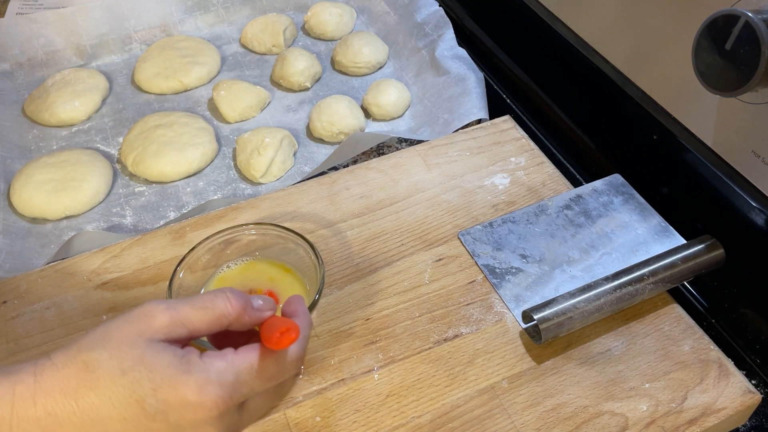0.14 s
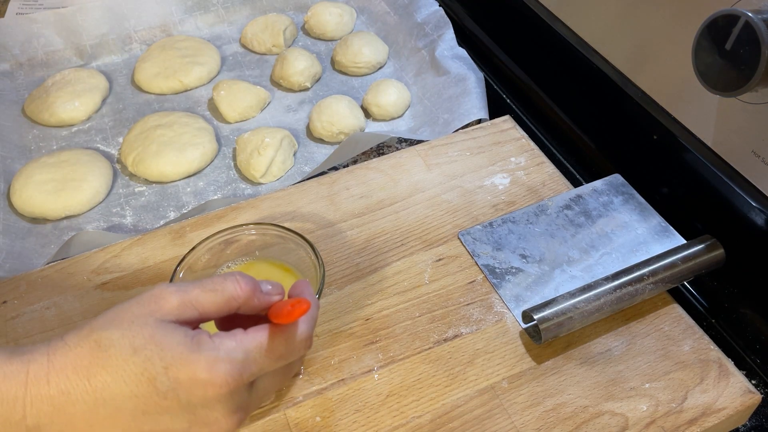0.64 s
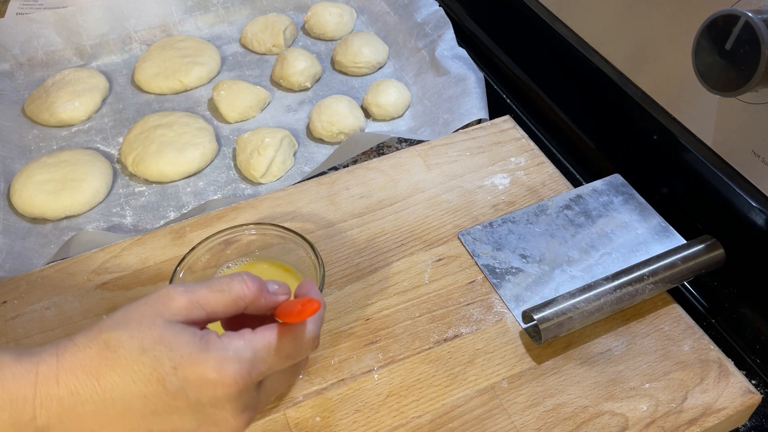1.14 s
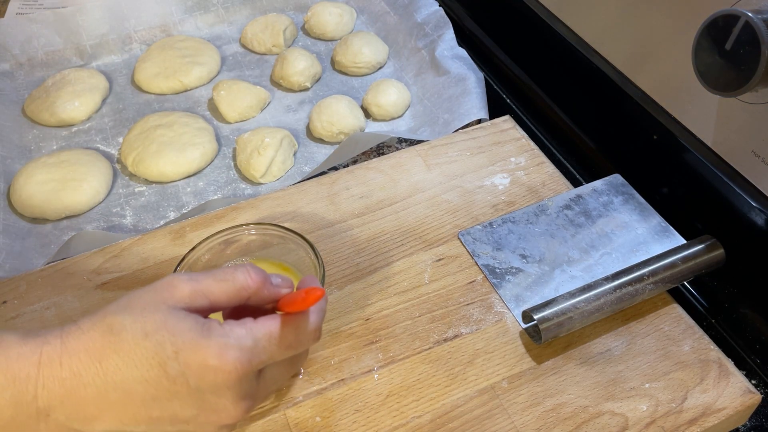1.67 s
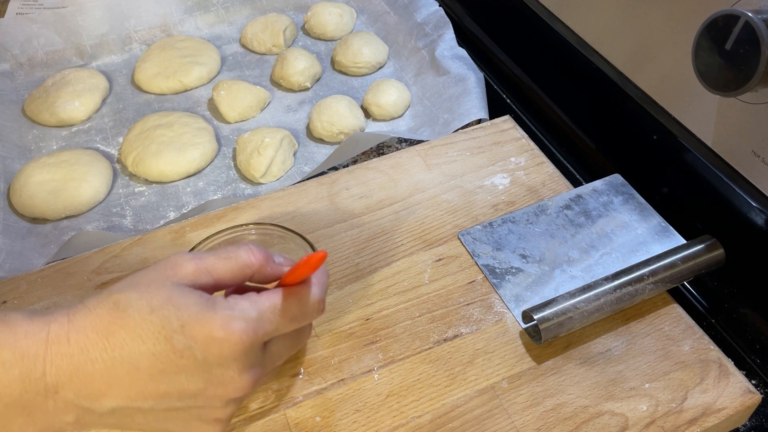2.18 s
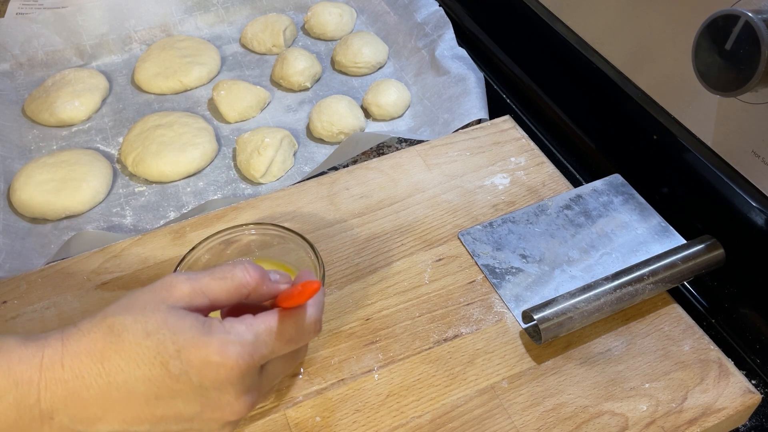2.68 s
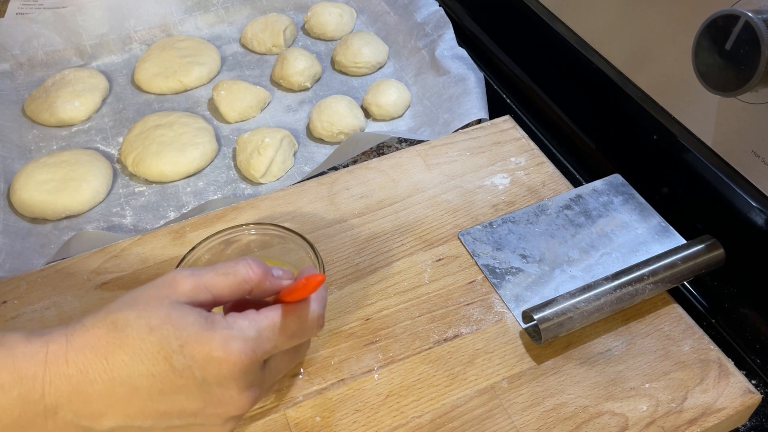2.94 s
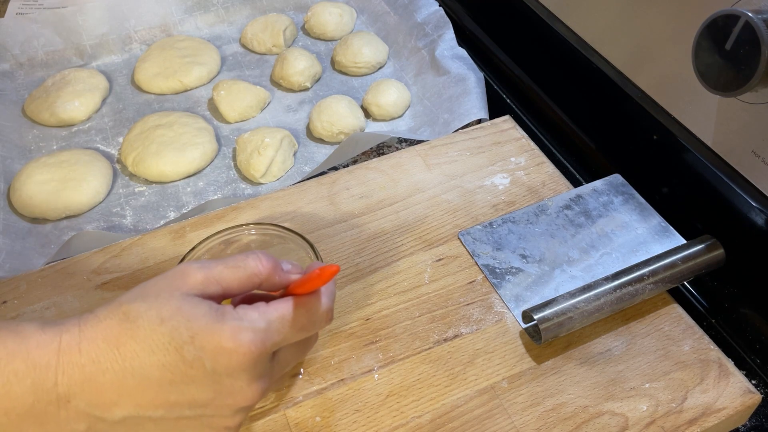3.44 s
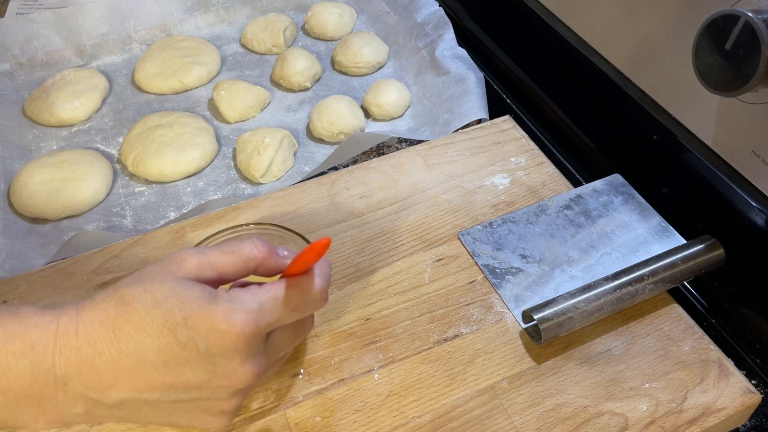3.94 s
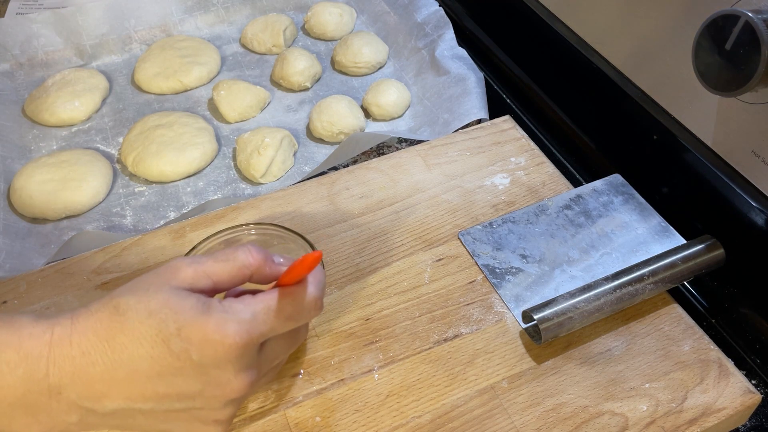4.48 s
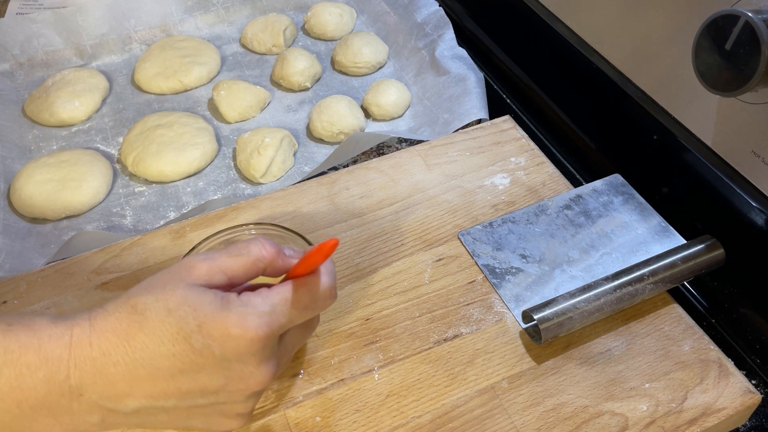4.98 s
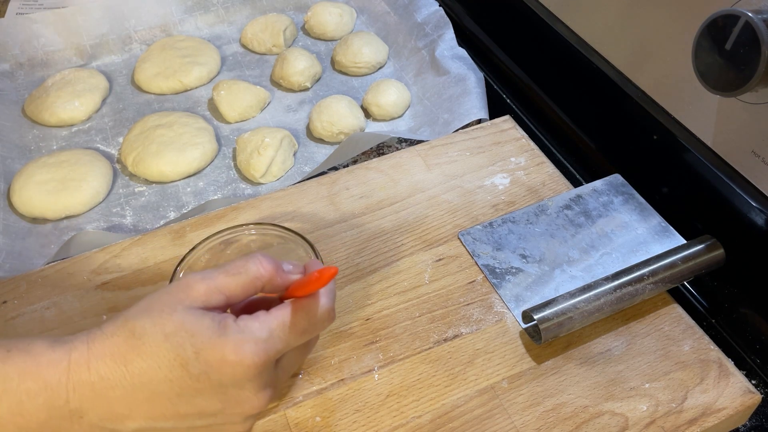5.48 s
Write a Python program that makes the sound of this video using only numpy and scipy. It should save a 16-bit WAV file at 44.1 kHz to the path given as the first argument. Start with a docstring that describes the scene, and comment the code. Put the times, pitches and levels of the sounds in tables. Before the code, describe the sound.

In a quiet kitchen, a silicone brush beats egg in a small glass bowl on a wooden board. For the first half second there is only soft room air and a faint, wavering low appliance hum. Light wet ticks and a short scrape start at 0.5, thickening into slaps by 0.8 and a strong splashy clatter around 0.95-1.05, with thin glass ringing. After a brief lull, drags and taps return at 1.4-2.0. A dense, hollow knocking cluster comes at 2.25-2.5, then a gap, and a sharp bright slap at 3.07. Looser slaps, bubble plips and a fading slosh fill 3.2-4.0; regular small clacks continue to a strong slap at 4.9. It then thins: a weak tap at 5.16, a barely audible squeak at 5.4 and a faint last touch at 5.55. Close, dry mono sound with short hard-wall reflections and softened extreme treble.

```python
"""In a quiet kitchen, a silicone brush beats egg in a small glass bowl that stands on a wooden board.
Wet bristles drag along the glass as lumpy noise with froth and ticks; slaps are bursts of splash and spray.
The bowl rings in thin glass tones; knocks, bumps and thuds are damped tones set off by short noise.
Bubbles plip as single tones and a rub squeaks faintly once. An appliance hums far off in wavering
narrow tones under the room air, and the hard walls give a short tail of fading noise."""
import sys
import numpy as np
from scipy import signal
from scipy.fft import rfft, irfft, next_fast_len
from scipy.io import wavfile
from scipy.ndimage import uniform_filter1d, map_coordinates

SR = 44100
rng = np.random.default_rng(int(sys.argv[2]) if len(sys.argv) > 2 else 0)


def gain_from_decibels(decibels):
    """Convert decibel values to linear amplitude factors."""
    exponent = np.asarray(decibels, float) / 20
    return 10 ** exponent


def wav_out(sig):
    """Save sig, one row per channel (or a flat mono array), as 16-bit PCM at SR to the path in sys.argv[1]."""
    wavfile.write(sys.argv[1], SR, np.round(np.clip(np.atleast_2d(sig).T, -1, 1) * 32767).astype(np.int16))


N = 247779  # length in samples

# The tones at which the glass bowl can ring. Each entry: pitch in Hz.
GLASS_HZ = [4036, 4140, 4245, 4435, 5810, 6465, 7130, 7255, 7480, 7840, 8500, 9120, 10345, 10950, 11250,
            12140, 13410, 14260]


def unit(x):
    """Scale to an rms (average strength) of 1 along the last axis."""
    return x / np.sqrt(np.mean(x ** 2, axis=-1, keepdims=True) + 1e-20)


def peak(x):
    """Scale each row to a peak of 1."""
    return x / np.abs(x).max(axis=1, keepdims=True)


def fade(t, t60, rise):
    """A smooth rise, then an even decay that falls 60 dB in t60 seconds."""
    return gain_from_decibels(-60 * t / t60) * (1 - np.exp(-t / rise)) ** 2


def filtered(x, response):
    """Multiply the spectrum of x by a complex response of frequency."""
    m = next_fast_len(x.shape[-1] + 8192)  # spare room for the filter to ring out
    spectrum = rfft(x, m) * response(np.fft.rfftfreq(m, 1 / SR))
    return irfft(spectrum, m)[..., :x.shape[-1]]


def along(points, hz):
    """Read between (Hz, value) points on a logarithmic pitch axis."""
    f, v = np.transpose(points)
    return np.interp(np.log(hz + 1), np.log(f + 1), v)


def coloured(x, spectrum):
    """Give x a colour of (Hz, dB) points, at rms 1."""
    return unit(filtered(x, lambda hz: gain_from_decibels(along(spectrum, hz))))


def resonances(peaks):
    """Response of things that ring: (Hz, width in Hz, dB) each, with alternating signs."""
    def response(f):
        total = 0
        for k, (centre, width, db) in enumerate(peaks):
            damping = 1j * f * width
            total = total + (-1) ** k * gain_from_decibels(db) * damping / (centre * centre - f * f + damping)
        return total
    return response


def wobble(rate):
    """A smooth random curve through `rate` random points a second."""
    points = rng.standard_normal(int(N * rate / SR) + 4)
    return map_coordinates(points, [np.arange(N) * rate / SR])


def patchy(x, depth_db):
    """Make x uneven with random patches of gain in time and frequency, at rms 1."""
    z = signal.stft(x, nperseg=256)[2]
    field = uniform_filter1d(rng.standard_normal(z.shape), size=3, axis=-2)
    field = uniform_filter1d(field, size=7, axis=-1)
    uneven = signal.istft(z * gain_from_decibels(depth_db * field / field.std()), nperseg=256)[1]
    return unit(uneven[..., :x.shape[-1]])


def placed(times, sounds):
    """Lay each row of sound on the timeline at its time in seconds."""
    starts = np.round(np.asarray(times) * SR).astype(int)
    at = starts[:, None] + np.arange(sounds.shape[1])
    return np.bincount(at.ravel(), sounds.ravel(), N + SR)[:N]


def grains(count, hz, cycles):
    """Damped sines scattered in time, pitch and size, at rms 1."""
    when, pitch, size = rng.random((count, 3)).T[:, :, None]
    hz = hz * 4 ** (pitch - .5)  # from half to double the middle pitch
    t = np.arange(SR // 40) / SR
    level = gain_from_decibels(-15 * np.log10(size + .12))  # many small grains, few large ones
    sound = level * fade(t, cycles / hz, .5 / hz) * np.sin(2 * np.pi * hz * t)
    return unit(placed(when[:, 0] * N / SR, sound))


def background():
    """Room air is coloured noise that drifts in level; the appliance is noise in narrow, unsteady tones."""
    # Colour of the room air. Each row: pitch in Hz, relative level in dB.
    air_colour = [(20, 3.5), (56, -9), (85, -37.5), (176, -5), (290, -11.5), (400, -9.5), (490, -22),
                  (1500, -29.5), (4000, -40.5), (15700, -46)]
    # The appliance's wavering tones. Each row: pitch in Hz, width in Hz, rms level in dB.
    hum_tones = [(50, 4.8, -70), (111.3, 7.4, -70.5), (334.2, 3.6, -68.5)]
    hum = 0
    for hz, width, db in hum_tones:
        tone = filtered(rng.standard_normal(N), resonances([(hz, width, 0)]))
        hum = hum + gain_from_decibels(db) * unit(tone)
    air_db = -62 + wobble(4.0)
    return gain_from_decibels(air_db) * coloured(rng.standard_normal(N), air_colour) + hum


def slaps():
    """Each slap splashes, sprays, thuds through the board and shakes the glass tones at random strengths."""
    # Slaps of the brush. Each row: start in seconds, level in dB (of all but the thud),
    # spray in dB over that level before a shared trim, contact time in ms before limiting.
    slap_table = [(0.492, -41, -23, 1.4), (0.513, -35.5, -19.5, 8.3), (0.704, -35, -11, 2.4),
                  (0.726, -29.5, -1.5, 1.1), (0.767, -34.5, -17, 2.8), (0.808, -35.5, -19, 8.7),
                  (0.826, -32.5, -6, 1.3), (0.977, -20.5, -16, 24), (1.012, -21.5, -11, 11.5),
                  (1.051, -14.5, -4, 3.05), (1.268, -53.5, -35, 0.58), (1.356, -48, -0.5, 2.1),
                  (1.43, -38, -24.5, 4.3), (1.493, -23, -12.5, 3.5), (1.605, -33, -8, 15),
                  (1.691, -36, -31, 4), (1.852, -39.5, -8.5, 2.6), (1.882, -31, -13, 18),
                  (1.917, -31.5, -14, 42), (1.99, -23.5, -4.5, 1.3), (2.018, -29, -3, 14),
                  (2.357, -25, -11, 4.1), (2.42, -25.5, -29.5, 8.5), (2.449, -20, -8.5, 4.8),
                  (2.5, -24, -8.5, 5.3), (2.933, -52.5, -30.5, 3.8), (3.003, -57, -16.5, 2),
                  (3.038, -40, -15, 1.2), (3.067, -19, -10.5, 2.7), (3.08, -14, -6.5, 3),
                  (3.255, -34, 2.5, 3.7), (3.289, -26.5, -10, 7.9), (3.452, -44.5, -8.5, 0.82),
                  (3.632, -36.5, -28, 8.2), (3.729, -32, -11, 12), (3.778, -27, -13.5, 5.4),
                  (3.835, -32.5, -6, 1.5), (3.983, -30.5, -28.5, 4.4), (4.014, -30, -15.5, 2.1),
                  (4.238, -41, -4, 0.75), (4.265, -31.5, -9.5, 0.74), (4.292, -30.5, -13, 7.9),
                  (4.334, -28.5, -9, 5.4), (4.413, -27, -6, 0.66), (4.483, -29.5, -11, 9),
                  (4.666, -56, -27.5, 1.3), (4.745, -29, -12, 9.1), (4.817, -28, -5.5, 1.1),
                  (4.903, -19.5, -8.5, 16.3), (5.156, -41.5, -13, 2.2), (5.556, -55.5, 1.5, 13)]
    # Bowl and board knocking together. Each row: pitch in Hz, width in Hz, relative level in dB.
    board_tones = [(341.6, 30.5, 9), (555, 39.5, 6), (747, 180, 1), (1256, 110, -3), (1512, 640, -5)]
    # Colours of splash and spray. Each row: pitch in Hz, relative level in dB.
    splash_colour = [(500, -20.5), (1600, -4), (2700, -5.5), (4100, -2.5), (7000, -15), (16000, -36.5)]
    spray_colour = [(4000, -2), (6500, -0.5), (11000, -5), (16000, -16.5)]
    s, db, spray_db, contact_ms = np.transpose(slap_table)[:, :, None]
    t = np.arange(SR // 4) / SR
    contact = np.clip(contact_ms, .2, 30) / 1000  # seconds
    noise = patchy(rng.standard_normal((len(s), 3, len(t))), depth_db=3.3)

    # a flatter landing builds and dies more slowly
    burst = peak(fade(t, 0.053 + 12 * contact, 0.47 * contact))
    splash = gain_from_decibels(-14.5) * burst * coloured(noise[:, 0], splash_colour)
    spray_rise = 1 - np.exp(-t / 0.0047)
    spray = gain_from_decibels(spray_db - 7.5) * burst * spray_rise * coloured(noise[:, 1], spray_colour)

    # from the thud of a middling slap: stronger slaps and drier ones land heavier
    thud_db = -44.5 + 0.97 * (db - db.mean()) - 0.67 * (spray_db - spray_db.mean())
    thud = gain_from_decibels(thud_db) * peak(filtered(burst * noise[:, 2], resonances(board_tones)))

    strength_db = 7 + 3.5 * rng.standard_normal((len(s), len(GLASS_HZ), 1))
    glass = resonances([(hz, 24, strength_db[:, k]) for k, hz in enumerate(GLASS_HZ)])
    ring = filtered(spray, glass)
    return placed(s[:, 0], gain_from_decibels(db) * (splash + spray + ring) + thud)


def kitchen(x):
    """Walls return a noise-like tail, each pitch dying at its own speed; it differs as the hand moves."""
    # How long the tail lasts. Each row: pitch in Hz, time to fall 60 dB in seconds.
    tail_times = [(2000, 0.26), (12000, 0.22)]
    block = SR // 4  # a new tail for every quarter second
    pieces = np.pad(x, (0, -N % block)).reshape(-1, block)
    noise = rng.standard_normal((len(pieces), SR // 2))
    hz, t, z = signal.stft(noise, SR, nperseg=256)
    decay = gain_from_decibels(-60 * t / along(tail_times, hz)[:, None])
    tail = signal.istft(z * decay, SR, nperseg=256)[1][:, :SR // 2]
    tail = tail / np.linalg.norm(tail, axis=1, keepdims=True)
    wet = signal.fftconvolve(pieces, tail, axes=1)
    return placed(np.arange(len(pieces)) * block / SR + .004, wet)  # the tail starts 4 ms late


def plips():
    """Each bubble of air caught in the egg rings at one clear pitch after a soft start."""
    # Plips. Each row: start in seconds, pitch in Hz, peak level in dB.
    plip_table = [(.511, 833, -47.5), (.578, 960, -48.5), (1.476, 760, -45), (3.774, 702, -41),
                  (3.778, 1970, -34.5), (3.806, 968, -44.5), (3.938, 2220, -51)]
    s, hz, db = np.transpose(plip_table)[:, :, None]
    t = np.arange(SR // 8) / SR
    cycles = 94  # until 60 dB down
    tone = fade(t, cycles / hz, 0.0013) * np.sin(2 * np.pi * hz * t)
    return placed(s[:, 0], gain_from_decibels(db) * peak(tone))


def strokes():
    """Bristles slip unevenly through the egg: lumpy noise, froth and ticks, part passed into the glass."""
    # Drags along the glass. Each row: start in seconds, length in seconds, slosh level at the start in dB,
    # hiss over slosh in dB, swell in dB per second.
    stroke_table = [(0.531, 0.19, -64.5, -7, 19), (0.982, 0.11, -66.5, 18.5, 0),
                    (1.396, 0.32, -62.5, -3.5, 20.5), (1.922, 0.14, -48.5, -4.5, -9),
                    (2.247, 0.22, -52, -1.5, 27), (2.973, 0.036, -64, -9, 14),
                    (3.149, 0.059, -49.5, 6.5, -11), (3.671, 0.53, -60.5, -4, -18),
                    (4.281, 0.12, -61.5, -19, -6.5), (4.468, 0.15, -56.5, 0, 7),
                    (4.908, 0.049, -54.5, 5, 34.5), (5.485, 0.11, -67, -11, 23)]
    # Colours of the low slosh and high hiss. Each row: pitch in Hz, relative level in dB.
    slosh_colour = [(60, -19), (200, -10), (600, 1.5), (2000, -5), (9000, -30)]
    hiss_colour = [(1000, -12), (4000, -2.5), (8000, -12), (16000, -25)]
    # the bristles bite quickly; the egg settles more slowly
    rise_db_per_s, fall_db_per_s = 292, 123.5
    start, length, db, hiss_db, swell = np.transpose(stroke_table)[:, :, None]
    t = np.arange(N) / SR - start
    held_db = db + swell * np.clip(t, 0, length)
    edge_db = rise_db_per_s * np.minimum(t, 0) - fall_db_per_s * np.maximum(t - length, 0)
    slosh_level = gain_from_decibels(held_db + edge_db).sum(axis=0)
    hiss_level = gain_from_decibels(held_db + hiss_db + edge_db).sum(axis=0)
    lumps = gain_from_decibels(1.2 * wobble(35) + 3 * wobble(150))

    slosh, hiss = patchy(rng.standard_normal((2, N)), depth_db=2.8)
    froth = gain_from_decibels(-3) * grains(count=1600, hz=1086, cycles=11.6)  # small bubbles
    slosh = slosh_level * lumps * (coloured(slosh, slosh_colour) + froth)
    ticks = gain_from_decibels(-8.5) * grains(count=2500, hz=3590, cycles=3.2)  # single bristles
    hiss = hiss_level * lumps * (coloured(hiss, hiss_colour) + ticks)

    # each glass tone is caught only now and then, the high ones more easily
    glints = 0
    for hz in GLASS_HZ:
        drive = gain_from_decibels(6 * wobble(20)) * hz / GLASS_HZ[-1]
        glints = glints + filtered(hiss * drive, resonances([(hz, 40, 9)]))
    return slosh + hiss + glints


def chimes():
    """A light touch away from the egg lets one glass tone ring on, roughened by egg lapping at the wall."""
    # Touches. Each row: start in seconds, pitch in Hz (the nearest glass tone is used),
    # level in dB before the roughening and fade.
    chime_table = [(.54, 7480, -57), (.98, 7840, -40.5), (1.014, 4140, -32), (1.053, 4036, -35),
                   (1.057, 4245, -41.5), (2.02, 4435, -39.5), (2.325, 11250, -43), (2.405, 5810, -46),
                   (3.13, 7130, -51.5), (3.731, 6465, -36.5), (4.49, 10345, -57), (4.818, 7255, -45.5),
                   (4.818, 12140, -47), (5.558, 7480, -59.5)]
    s, hz, db = np.transpose(chime_table)[:, :, None]
    t = np.arange(SR // 2) / SR
    modes = np.array(GLASS_HZ)
    hz = modes[np.abs(hz - modes).argmin(axis=1), None]
    lapping = uniform_filter1d(rng.standard_normal((len(s), len(t))), size=400, axis=-1)
    level = gain_from_decibels(db + 2.9 * unit(lapping))
    ring = fade(t, 0.23, 0.0028) * np.sin(2 * np.pi * hz * t)
    return placed(s[:, 0], level * ring)


def knocks():
    """A hard first touch and quick chatter set off two damped tones of brush head and bowl."""
    # Knocks of the brush head. Each row: start in seconds, peak level in dB, low tone in Hz,
    # high tone in Hz, width as a share of the pitch.
    knock_table = [(0.931, -24, 766, 1910, 0.53), (.997, -24, 900, 2130, 0.4),
                   (1.048, -32.5, 606, 1640, 0.082), (1.429, -32, 2270, 2570, 0.13),
                   (1.919, -28, 1670, 3440, 0.15), (2.245, -27.5, 616, 2100, 0.18),
                   (2.329, -35.5, 546, 2080, 0.15), (2.422, -17, 600, 1610, 0.65),
                   (2.449, -20, 760, 1450, 0.26), (2.465, -21.5, 1250, 3540, 0.14),
                   (2.5, -21, 1280, 1670, 0.17), (2.658, -31, 613, 1770, 1),
                   (3.973, -22.5, 1580, 3480, 0.091), (3.972, -25, 2120, 3770, 0.063),
                   (4.462, -27.5, 557, 1720, 0.65), (4.588, -27, 476, 1600, 0.62),
                   (4.631, -36, 1130, 1570, .4), (4.782, -30, 2070, 3520, 0.44),
                   (5.159, -45, 1540, 1950, 0.12), (5.552, -40, 2040, 2850, 0.22)]
    s, db, low_hz, high_hz, width = np.transpose(knock_table)[:, :, None]
    t = np.arange(SR // 8) / SR
    push, first_touch = 1, 8.2  # against chatter of rms 1 before its fade
    chatter = rng.standard_normal((len(s), len(t)))
    contacts = fade(t, 0.042, 0.00053) * (chatter + push)
    contacts[:, 0] += first_touch
    contacts = uniform_filter1d(contacts, size=7)
    low_tone = resonances([(low_hz, width * low_hz, 0)])
    high_tone = resonances([(high_hz, width * high_hz, 0)])

    def brush_head(hz):
        no_sharp_edge = 1 / (1 + 1j * hz / high_hz) ** 2  # silicone is soft
        no_boom = 2j * hz / (low_hz / 2 + 2j * hz)  # the head is light
        return (low_tone(hz) + high_tone(hz)) * no_sharp_edge * no_boom

    return placed(s[:, 0], gain_from_decibels(db) * peak(filtered(contacts, brush_head)))


def bumps():
    """The bowl rocks on the board: each soft push sets off one low, damped tone."""
    # Bumps. Each row: start in seconds, peak level in dB, pitch in Hz.
    bump_table = [(1.031, -51, 58), (2.42, -43, 113), (2.447, -33, 220), (2.491, -46, 142),
                  (3.07, -41, 348), (4.461, -44, 197), (5.335, -50, 318), (5.572, -47, 170)]
    s, db, hz = np.transpose(bump_table)[:, :, None]
    t = np.arange(SR // 4) / SR
    shove = fade(t, 0.031, 0.0023) * rng.standard_normal((len(s), len(t)))
    tone = resonances([(hz, 0.3 * hz, 0)])
    thump = filtered(shove, lambda f: tone(f) ** 2)  # squared: the tone acts twice
    return placed(s[:, 0], gain_from_decibels(db) * peak(thump))


def squeak():
    """A faint squeak: rubbing noise squeezed around one pitch, swelling and fading once."""
    # The squeak. Its one row: start in seconds, length in seconds, pitch in Hz,
    # width in Hz of one filter pass (there are two), rms level in dB before the swell and fade.
    squeak_row = (5.395, .085, 2900, 500, -73)
    start, length, hz, width, db = squeak_row
    t = np.arange(SR // 4) / SR
    tone = resonances([(hz, width, 0)])
    rub = unit(filtered(rng.standard_normal(len(t)), lambda f: tone(f) ** 2))
    swell = np.sin(np.pi * np.clip(t / length, 0, 1))
    return placed([start], (gain_from_decibels(db) * rub * swell)[None])


def scene():
    """Bowl, its echo and the room, in one channel."""
    bowl = slaps() + plips() + strokes() + chimes() + knocks() + bumps() + squeak()
    return (background() + bowl + gain_from_decibels(-5.5) * kitchen(bowl))[None]


def top_cut(x):
    """Nothing passes above the cut-off."""
    return signal.sosfilt(signal.butter(12, 15850, fs=SR, output="sos"), x)


def record(dry):
    """The phone keeps only what lies below 15850 Hz, then stores it."""
    mix = filtered(dry, lambda hz: hz < 15850)
    return top_cut(mix)


dry = scene()
out = record(dry)
wav_out(out)
```